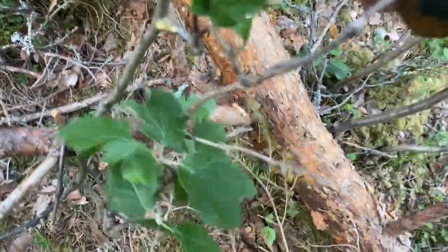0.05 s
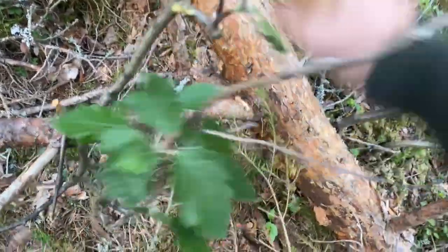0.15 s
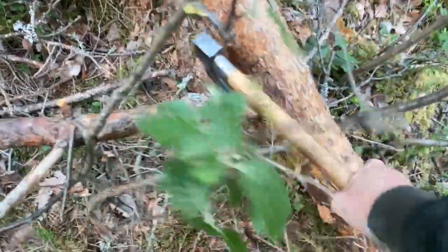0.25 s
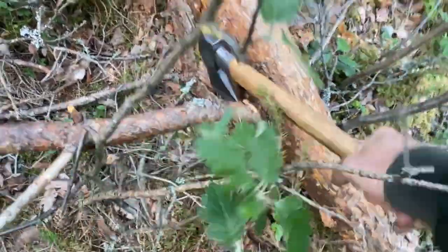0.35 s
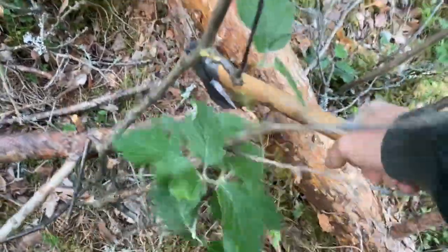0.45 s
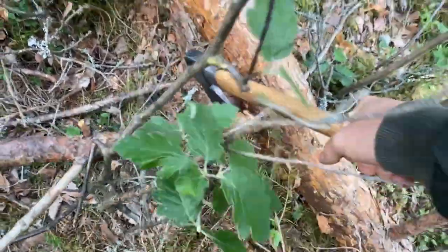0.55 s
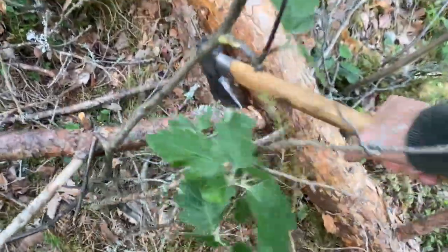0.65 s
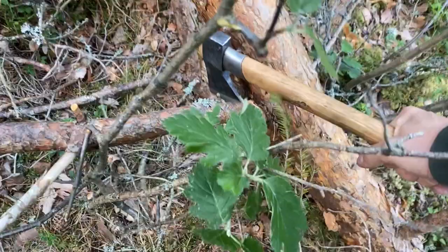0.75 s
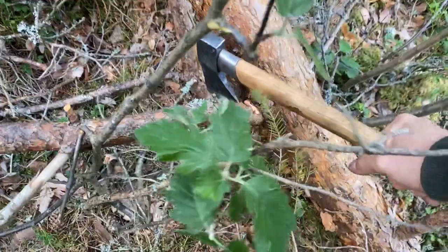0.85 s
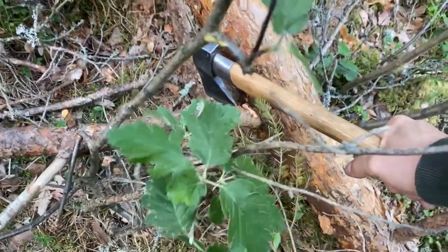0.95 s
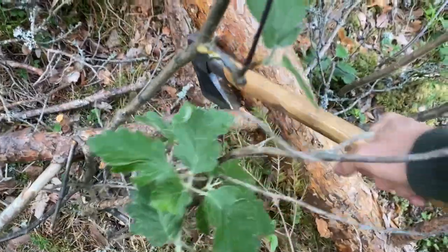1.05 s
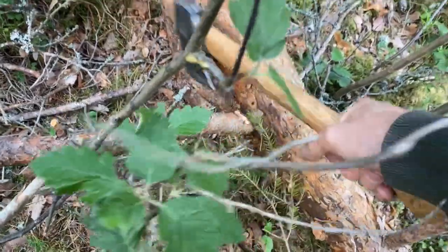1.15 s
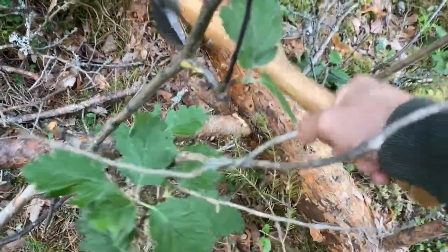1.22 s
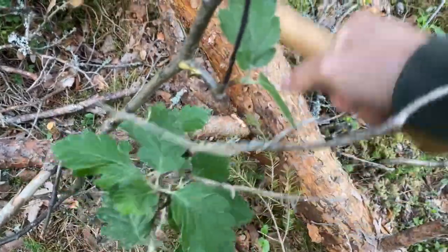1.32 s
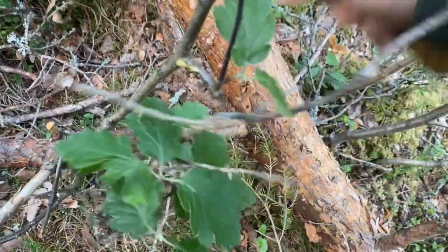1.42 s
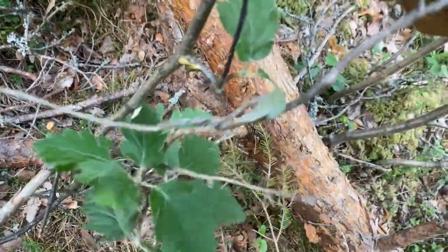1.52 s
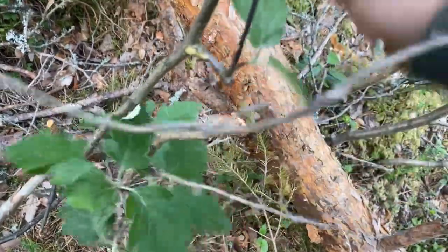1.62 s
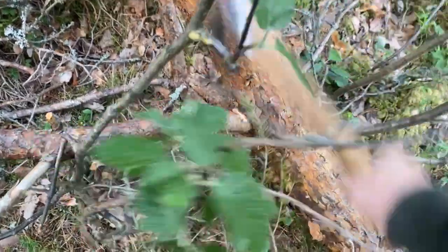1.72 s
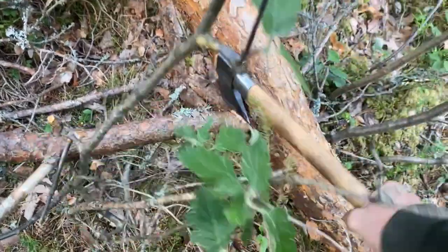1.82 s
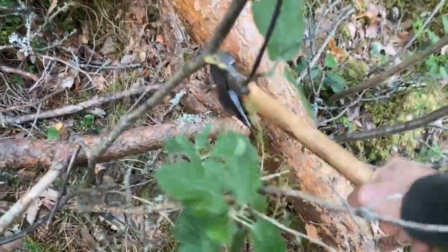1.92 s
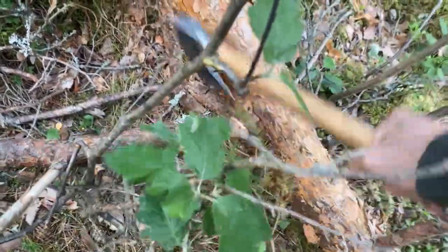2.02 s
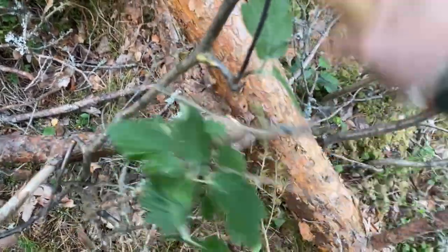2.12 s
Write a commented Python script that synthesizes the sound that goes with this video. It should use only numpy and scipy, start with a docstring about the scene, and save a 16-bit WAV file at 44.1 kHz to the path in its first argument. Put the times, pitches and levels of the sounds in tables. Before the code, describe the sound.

Close, dry outdoor sound: an axe strikes a log, chips tick and scatter, the blade is softly worked loose with a tiny ping, leaves rustle, then a second, slightly higher-toned knocking blow lands.

```python
"""A small axe chops twice into a fallen pine log in a forest, close to the microphone.
Each blow is a noise swish, a bark graze, a noise crack and a knock of damped log modes, then noise scatter and tail.
Ticks, snapping twigs and scrapes are noise bursts; the levered blade pings on two sines, low bumps are sine pulses.
Leaves and a sleeve rustle (grainy noise and single flicks), moving air rumbles on the microphone, the forest is still."""
import sys
import numpy as np
from scipy import signal
from scipy.fft import rfft, irfft
from scipy.io import wavfile
from scipy.ndimage import uniform_filter1d

SR = 44100
rng = np.random.default_rng(int(sys.argv[2]) if len(sys.argv) > 2 else 0)


def dump_mix(stems):
    """Bounce the given channels to the path in sys.argv[1] as a 16-bit WAV at rate SR."""
    frames = np.atleast_2d(stems).T  # one column per channel
    limited = np.clip(frames, -1, 1)  # hard clip at full scale
    pcm = np.round(limited * 32767).astype(np.int16)
    wavfile.write(sys.argv[1], SR, pcm)


N = 97020
T = np.arange(N) / SR  # s

# Likeness of left and right, close sources: f/Hz, likeness/0-1
NEAR = [(100, 0.95), (3000, 1), (16000, 0.95)]
# Likeness of left and right, spread sources: f/Hz, likeness/0-1
DIFFUSE = [(60, 1), (290, 0.32), (640, 0.13), (3000, 0.35), (7000, 0.91), (10000, 1)]
# Colour of twigs and leaf flicks: f/Hz, relative density/dB
TWIG_COLOUR = [(100, 4), (500, -2.5), (3000, -6.5), (7000, 5), (12000, -10), (16000, -3.5)]


def amp(db):
    """Decibels to gain."""
    return 10 ** (np.asarray(db) / 20)


def evened(x):
    """Scales to rms 1."""
    return x / np.sqrt(np.mean(x ** 2) + 1e-20)


def read(points, hz):
    """Reads a table on a log-frequency axis."""
    f, value = np.transpose(points)
    return np.interp(np.log(hz + 1), np.log(f), value)


def level(points):
    """Gain over time from a table of t/s, level/dB."""
    return amp(np.interp(T, *np.transpose(points)))


def add(mix, s, sound):
    """Mixes a sound in at a time."""
    part = mix[:, max(round(s * SR), 0):][:, :sound.shape[-1]]
    part += sound[..., :part.shape[1]]


def noise(spectrum, likeness, size, grain_db=0, peak_hz=1000, peak_db=0, ripple_db=0):
    """Stereo noise of a given colour, optionally grainy, with one broad resonance or many small random ones."""
    hz = np.fft.rfftfreq(size, 1 / SR)
    grains = evened(uniform_filter1d(rng.standard_normal(size), size=24))
    grains = np.clip(grains, -3, 3)
    a, b = rfft(rng.standard_normal((2, size)) * amp(grain_db * grains))
    same = np.clip(read(likeness, hz), 0, 1)
    right = same * a + np.sqrt(1 - same ** 2) * b
    ripple = np.interp(hz, np.linspace(0, SR / 2, 120), rng.standard_normal(120))
    width_oct = 0.13
    peak = np.exp(-.5 * (np.log2((hz + 1) / peak_hz) / width_oct) ** 2)
    colour = amp(read(spectrum, hz) + peak_db * peak + ripple_db * ripple)
    return evened(irfft(np.array([a, right]) * colour, size))


def burst(source, rise_s, decay_s):
    """Gives noise a quick rise and an exponential fall; the shape alone sets the total energy."""
    t = T[:source.shape[1]]
    shape = (1 - np.exp(-t / rise_s)) * np.exp(-t / decay_s)
    shape /= shape.max()
    return evened(source * shape) * np.sqrt(np.mean(shape ** 2))


def rustle():
    """Leaves and clothing: grainy noise whose level wanders, plus single leaf flicks that decay exponentially."""
    # Rustle level: t/s, level/dB
    rustle_level = [(0, -47), (.07, -53), (.21, -45), (.31, -60.5), (.35, -48), (.41, -54), (.52, -58.5),
                    (.7, -61.5), (.87, -67.5), (1.06, -63), (1.29, -63.5), (1.35, -55), (1.44, -59.5),
                    (1.54, -54.5), (1.83, -62.5), (1.91, -52.5), (1.99, -58.5), (2.17, -52), (2.2, -55)]
    # Rustle colour: f/Hz, relative density/dB
    rustle_colour = [(60, -3.5), (250, 3.5), (600, 1), (1200, 3), (2000, -2), (3300, 0.5), (6000, -1),
                     (8500, -7.5), (12000, -7), (16000, -10)]
    flicks_per_s, flick_db, flick_decay_s = 110, -9.5, .0012  # dB relative to the rustle
    flicks = (rng.random(N) < flicks_per_s / SR) * rng.uniform(.3, 1, N)
    flicks = evened(signal.lfilter([1], [1, -np.exp(-1 / (flick_decay_s * SR))], flicks))
    leaves = noise(rustle_colour, DIFFUSE, size=N, grain_db=3.5)
    leaves = leaves + amp(flick_db) * flicks * noise(TWIG_COLOUR, NEAR, size=N)
    return level(rustle_level) * leaves


def wind():
    """Air moving over the microphone: low noise that swells and sinks."""
    # Wind level: t/s, level/dB
    wind_level = [(0, -65), (.2, -55), (.3, -52), (.42, -63), (.57, -66.5), (.66, -49.5), (.8, -56.5),
                  (.87, -83), (1.12, -73.5), (1.21, -52), (1.47, -51), (1.7, -58), (1.93, -49), (2.03, -61),
                  (2.13, -53), (2.2, -70)]
    # Wind colour: f/Hz, relative density/dB
    wind_colour = [(18, -27), (38, -2.5), (62, 6.5), (100, -5.5), (160, -20), (2000, -94)]
    return level(wind_level) * noise(wind_colour, NEAR, size=N)


def still_forest():
    """Steady, spread background noise."""
    # Background colour: f/Hz, relative density/dB
    air_colour = [(20, -11.5), (100, 2), (250, 0), (600, -1), (1200, -10), (2500, -13), (6000, -26),
                  (16000, -34)]
    return amp(-62) * noise(air_colour, DIFFUSE, size=N)


def bumps():
    """A few dull cycles that swell and fade."""
    # Soft low bumps, probably handling and shifting weight: t/s, level/dB, f/Hz, length/s
    bump_list = [(0.106, -43, 102, 0.054), (0.348, -44, 112, 0.04), (0.701, -43.5, 96.9, 0.054),
                 (0.881, -45.5, 99, 0.033), (1.082, -45.5, 190, .024), (1.206, -38, 64.6, 0.046),
                 (1.323, -40, 66, 0.047), (1.44, -45.5, 78, .07), (1.63, -42.5, 91, 0.03),
                 (1.859, -40.5, 80, 0.039)]
    out = np.zeros((2, N))
    for s, db, hz, length_s in bump_list:
        t = T[:round(length_s * SR)]
        add(out, s, amp(db) * signal.windows.hann(len(t)) * np.sin(2 * np.pi * hz * t))
    return out


def swish():
    """Axe swing: noise that grows exponentially up to the blow."""
    # Swish colour: f/Hz, relative density/dB
    swish_colour = [(40, -4), (200, 2.5), (700, -2.5), (1200, -10), (2000, -10), (5000, -6), (8000, -26),
                    (16000, -33)]
    grow_s = 0.015
    air = noise(swish_colour, NEAR, size=4096, grain_db=-4.5)
    return (air * np.exp(-T[:air.shape[1]] / grow_s))[:, ::-1]


def knock(spot):
    """Heavily damped log modes swell as the blade bites, neighbours in opposite sign, over one low push."""
    # Modes of log and axe: f/Hz, t60/s, relative level at spot one/dB, at spot two/dB
    modes = [(139, .052, -9, -8), (192.7, 0.054, -1.5, -5), (272, .034, 0, -3), (345, .022, 4, -8),
             (477, .035, -1.5, -19.5), (444.5, 0.062, -17.5, -29.5), (579.3, .024, -0.5, 10),
             (644, 0.012, 9, 12.5), (811, .07, -18, -28.5), (884, .014, -14.5, 7),
             (1039, .048, -12.5, -29.5), (1105, 0.028, -9, -6.5), (1428, 0.019, -19.5, -11.5),
             (3006, .03, -11, -28), (4150, .022, -12.5, -32)]
    bite_s = 0.0046  # the force builds while the blade sinks in
    push_db, push_delay_s, push_width_s = -10.5, 0.0023, 0.0025  # the whole log gives way once
    t = T[:SR // 4]
    ring = np.zeros(len(t))
    for k, (hz, t60_s, *dbs) in enumerate(modes):
        sign = -(-1) ** k
        ring += sign * amp(dbs[spot] - 60 * t / t60_s) * np.sin(2 * np.pi * hz * t)
    u = (t - push_delay_s) / push_width_s
    push = amp(push_db) * (1 - u ** 2) * np.exp(-u ** 2 / 2)
    return (ring + push) * (1 - np.exp(-t / bite_s))


def graze(spot, lead_s):
    """The blade grazes the bark just before it bites: the windowed onset of the knock."""
    onset = knock(spot)[:round(lead_s * SR)]
    return onset * signal.windows.tukey(len(onset))


def crack(spot, decay_s):
    """Fibres snap within a millisecond or two; the struck spot sets their colour."""
    # Crack colour: f/Hz, relative density at spot one/dB, at spot two/dB
    crack_colour = [(300, -13.5, -16), (1300, -9, -10.5), (2000, -2.5, 3.5), (2600, -4.5, -6),
                    (2900, -4.5, 4.5), (3330, -13.5, 5), (4450, 5.5, -6), (5300, 3.5, -5.5),
                    (5700, -9.5, 4), (6600, -2.5, -11), (7700, -2.5, 0), (9000, -14, -4.5),
                    (11207, -4.5, -5), (16000, -21.5, -23)]
    rise_s = 0.00092
    snaps = burst(rng.standard_normal((1, 1024)), rise_s, decay_s)[0]
    snaps = rfft(np.pad(snaps, 512))
    hz = np.fft.rfftfreq(2 * len(snaps) - 2, 1 / SR)
    colour = amp(read(np.array(crack_colour)[:, [0, 1 + spot]], hz))
    flattened = snaps / np.sqrt(uniform_filter1d(abs(snaps) ** 2, size=9))
    sound = irfft(flattened * colour)
    return sound / np.linalg.norm(sound) * np.sqrt(2 * decay_s * SR)


def clumped(source):
    """Bits of bark and litter land in clumps a few milliseconds long."""
    clump_db = 2.4
    clumps = evened(uniform_filter1d(rng.standard_normal(source.shape[1]), size=200))
    return source * amp(clump_db * clumps)


def scatter():
    """Bits hitting the ground: clumped noise that dies away."""
    # Scatter colour: f/Hz, relative density/dB
    scatter_colour = [(40, -18.5), (190, 3.5), (400, 3.5), (650, 3), (1200, -9), (3000, -23.5),
                      (5200, -18.5), (7000, -21), (11000, -16.5), (16000, -32.5)]
    rise_s, t60_s = .003, 0.09
    bits = clumped(noise(scatter_colour, NEAR, size=8192, grain_db=2.0, ripple_db=2.0))
    return burst(bits, rise_s, t60_s / np.log(1000))


def forest_tail():
    """Faint forest tail: spread, clumped noise with a slow rise."""
    # Tail colour: f/Hz, relative density/dB
    tail_colour = [(40, -6), (120, 8.5), (250, 0.5), (700, -8.5), (1070, -5.5), (1400, -13), (1700, -8.5),
                   (2300, -14), (2950, -8), (3400, -20), (6000, -12), (16000, -18)]
    rise_s, t60_s = 0.051, 0.25
    tail = clumped(noise(tail_colour, DIFFUSE, size=32768, grain_db=3.5, peak_hz=1090, peak_db=5))
    return burst(tail, rise_s, t60_s / np.log(1000))


def axe():
    """Each blow: swish, graze, crack, knock, scatter and forest tail; each lands on another spot."""
    # Blows: t/s, crack level/dB, crack decay/s, knock level/dB, scatter level/dB, swish level/dB
    blows = [(0.2182, -11.5, 0.001, 0.5, -19.5, -33.5), (1.7272, -11.5, 0.0011, 1, -22, -44.5)]
    graze_db, graze_lead_s = -22, .0075
    tail_db = -16.5  # relative to the scatter
    out = np.zeros((2, N))
    for spot, (s, crack_db, crack_s, knock_db, scatter_db, swish_db) in enumerate(blows):
        swing = swish()
        add(out, s - swing.shape[1] / SR, amp(swish_db) * swing)
        add(out, s - graze_lead_s, amp(graze_db) * graze(spot, graze_lead_s))
        snap = crack(spot, crack_s)
        add(out, s - len(snap) / 4 / SR, amp(crack_db) * snap)  # a quarter is leading pad
        add(out, s, amp(knock_db) * knock(spot))
        add(out, s, amp(scatter_db) * scatter())
        add(out, s, amp(scatter_db + tail_db) * forest_tail())
    return out


def twigs():
    """Twigs and bark snap or knock: grainy noise bursts, each with one prominent pitch."""
    # Snaps: t/s, level/dB, decay/s, pitch f/Hz, prominence of the pitch/dB
    twig_list = [(0.2099, -24, .0012, 4900, 25.5), (0.2226, -13, 0.0014, 4540, 26),
                 (0.2436, -29, 0.0018, 5500, 10), (1.09, -38, .005, 12000, 17),
                 (1.379, -46.5, 0.005, 11700, 20), (1.4621, -38, 0.0044, 11500, 16),
                 (1.582, -43, 0.0076, 11600, 11), (1.630, -47, .003, 2500, 20), (1.694, -38, .004, 5260, 3),
                 (1.7195, -38.5, 0.0068, 2506, 14.5), (1.751, -31, .003, 5720, 9.5),
                 (1.7778, -30, .003, 2200, 14.5), (1.8882, -40.5, 0.0034, 10700, 20.5)]
    rise_s = 0.00056
    out = np.zeros((2, N))
    for s, db, decay_s, hz, peak_db in twig_list:
        snap = noise(TWIG_COLOUR, NEAR, size=2048, grain_db=7, peak_hz=hz, peak_db=peak_db, ripple_db=2)
        add(out, s, amp(db) * burst(snap, rise_s, decay_s))
    return out


def ticks():
    """Bright ticks, most of them shortly after a blow: very short noise bursts."""
    # Ticks: t/s, level/dB, decay/s
    tick_list = [(0.2359, -10, .0004), (0.2698, -23.5, .0014), (.2778, -38, .0012), (.627, -40, 0.00094),
                 (1.1, -26.5, .0005), (1.7434, -16, .0004), (1.75, -21, .0012), (1.7772, -21, .0011),
                 (1.7892, -31, .0006)]
    # Tick colour: f/Hz, relative density/dB
    tick_colour = [(300, -29.5), (2000, -26), (4500, -20.5), (6000, -15), (8800, -13.5), (10900, -6.5),
                   (12500, -14), (16000, -24.5)]
    rise_s = .00015
    out = np.zeros((2, N))
    for s, db, decay_s in tick_list:
        add(out, s, amp(db) * burst(noise(tick_colour, NEAR, size=1024), rise_s, decay_s))
    return out


def scrapes():
    """Blade and sleeve scrape wood, bark and leaves: grainy noise under a rounded stroke."""
    # Scrapes: t/s, length/s, level/dB
    scrape_list = [(1.011, 0.012, -52.5), (1.078, 0.057, -51.5), (1.457, 0.046, -43.5)]
    # Scrape colour: f/Hz, relative density/dB
    scrape_colour = [(100, 0.5), (500, 1.5), (1500, -2), (2600, 0), (6000, 3.5), (8500, -4), (12000, 4),
                     (16000, -10.5)]
    out = np.zeros((2, N))
    for s, length_s, db in scrape_list:
        phase = np.pi * np.minimum(T[:SR // 8] / length_s, 1)
        stroke = np.sqrt(np.maximum(np.sin(phase), 0))
        grit = noise(scrape_colour, DIFFUSE, size=len(stroke), grain_db=2.5, ripple_db=0.5)
        add(out, s, amp(db) * stroke * grit)
    return out


def release():
    """The blade pings faintly as it is levered, and the log knocks softly as it lets go."""
    # Modes of the stuck blade: f/Hz, level/dB
    ping_modes = [(3980, -45.5), (5370, -48)]
    ping_s, ping_t60_s, ping_rise_s = 1.013, .04, 0.00056
    free_s, free_db = 1.09, -42
    out, t = np.zeros((2, N)), T[:SR // 8]
    ping = sum(amp(db - 60 * t / ping_t60_s) * np.sin(2 * np.pi * hz * t) for hz, db in ping_modes)
    add(out, ping_s, ping * (1 - np.exp(-t / ping_rise_s)))
    add(out, free_s, amp(free_db) * knock(0))
    return out


def scene():
    """Everything reaches the right microphone a little later than the left."""
    surroundings = rustle() + wind() + still_forest()
    left, right = surroundings + bumps() + axe() + twigs() + ticks() + scrapes() + release()
    right_lag_s, left_db, right_db = .000052, -0.43, 0.15
    lag = np.exp(-2j * np.pi * np.fft.rfftfreq(N, 1 / SR) * right_lag_s)
    return np.array([left * amp(left_db), irfft(rfft(right) * lag, N) * amp(right_db)])


def record(dry):
    """The loudest peaks are rounded off; then the band limit."""
    ceiling, edge_hz = .95, 16100
    rounded = dry / (1 + (dry / ceiling) ** 6) ** (1 / 6)
    lowpass = signal.firwin(255, edge_hz, window=("kaiser", 9), fs=SR)
    return signal.oaconvolve(rounded, lowpass[None], "same", axes=1)


dry = scene()
out = record(dry)
dump_mix(out)
```